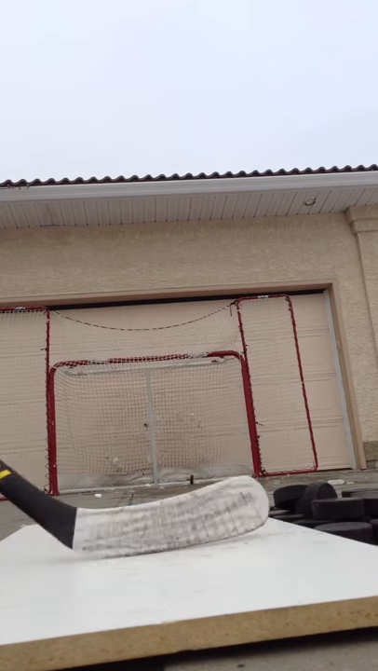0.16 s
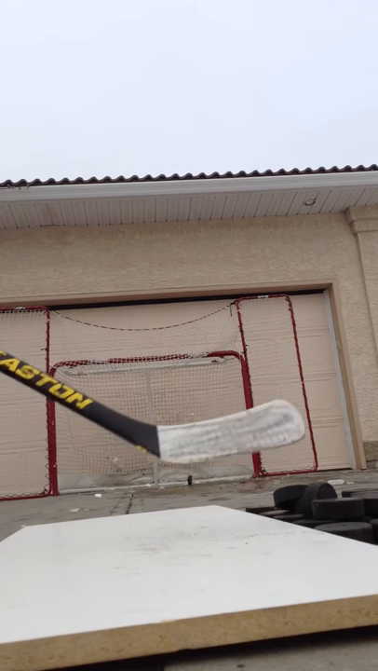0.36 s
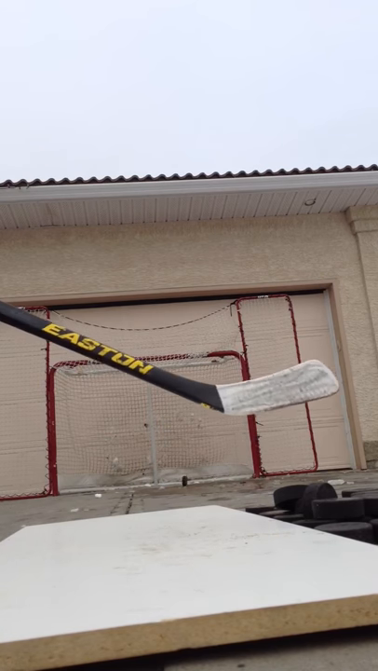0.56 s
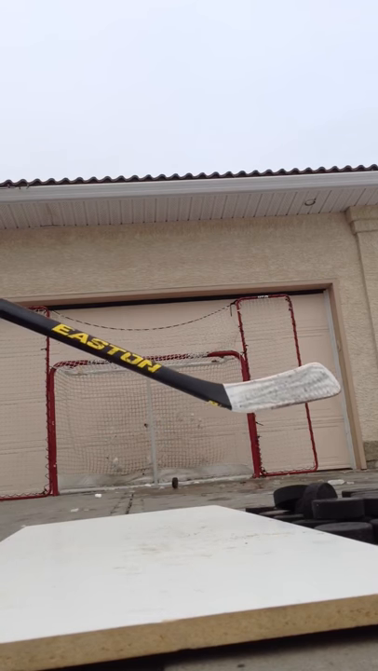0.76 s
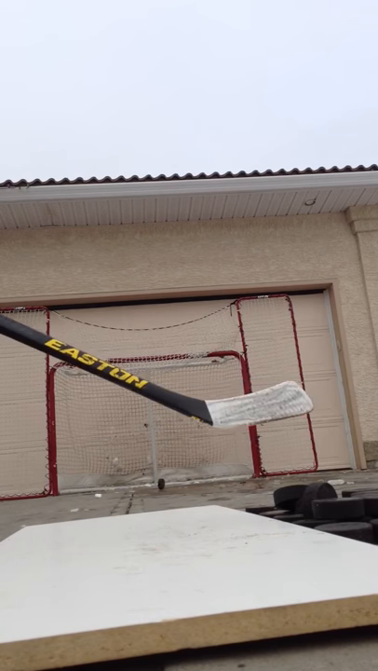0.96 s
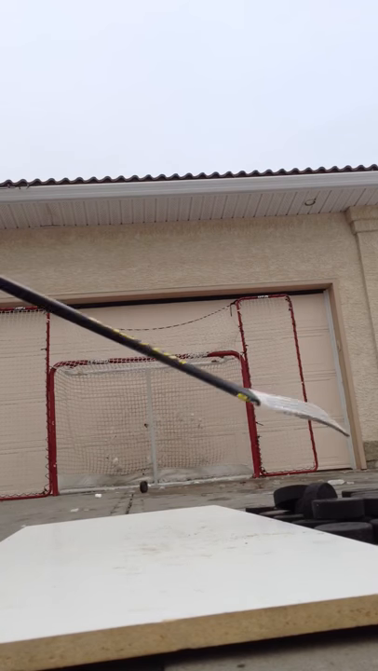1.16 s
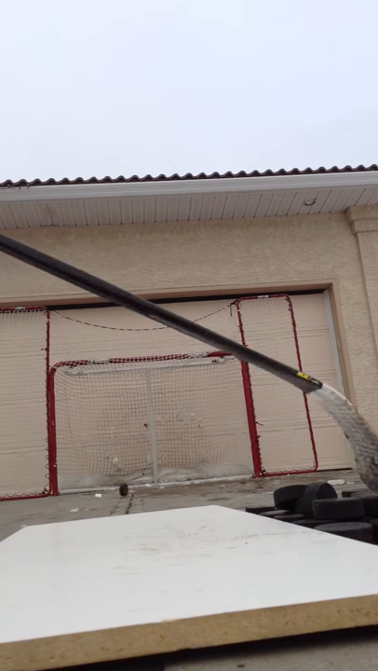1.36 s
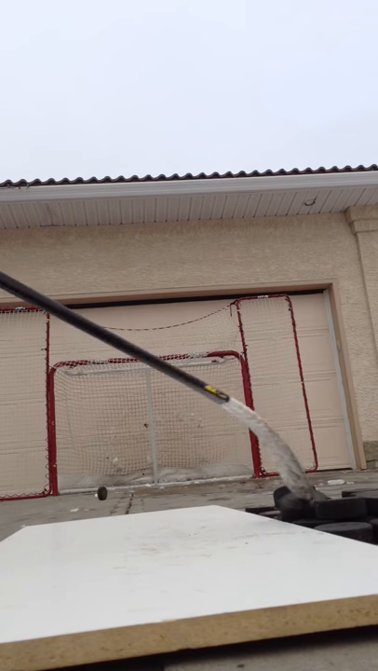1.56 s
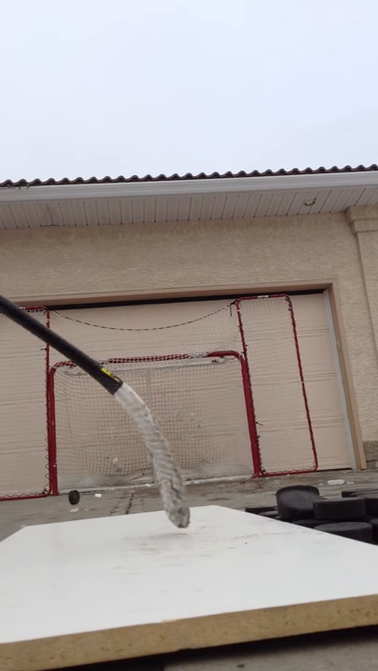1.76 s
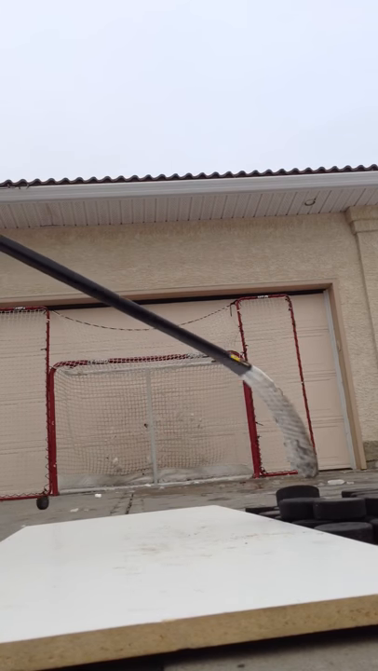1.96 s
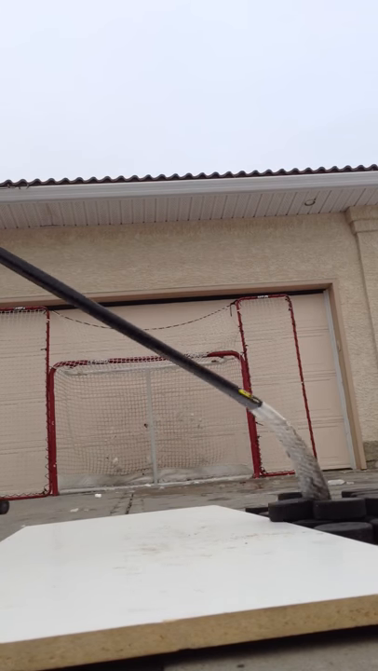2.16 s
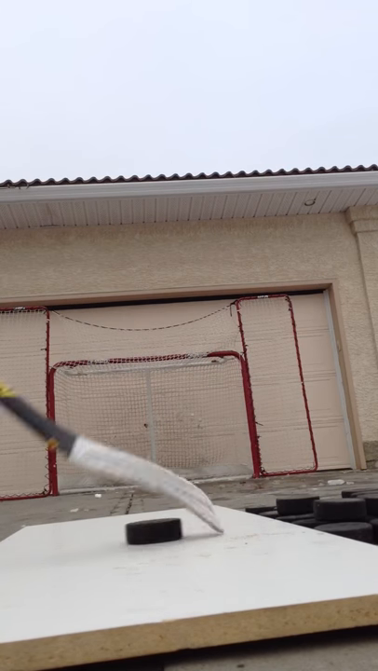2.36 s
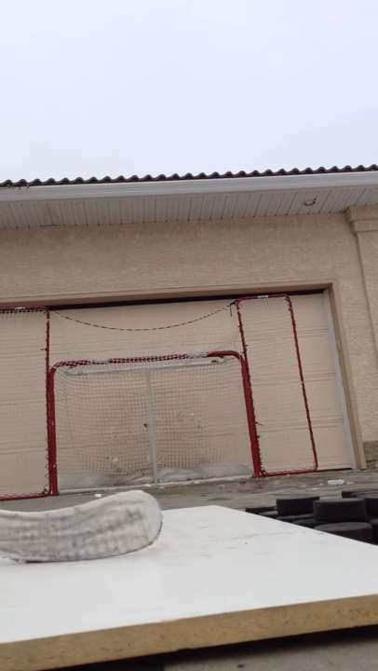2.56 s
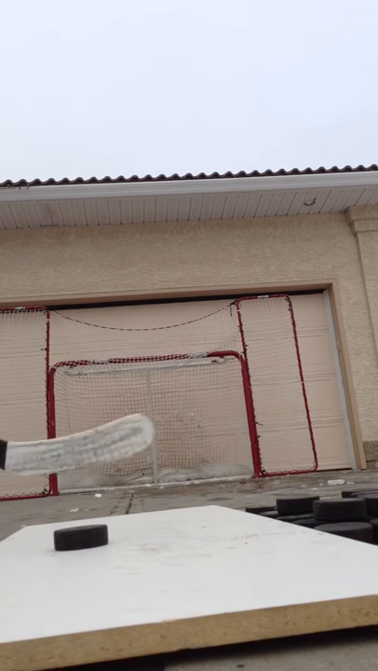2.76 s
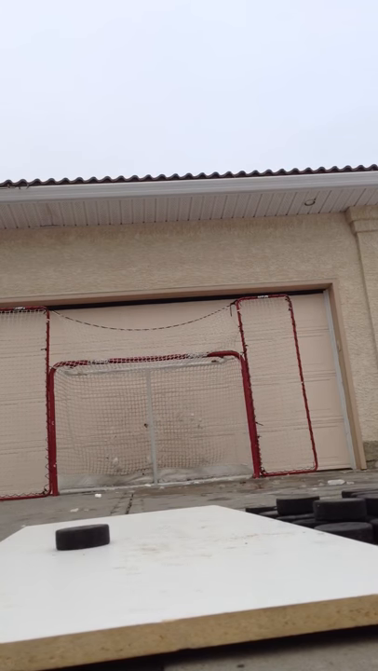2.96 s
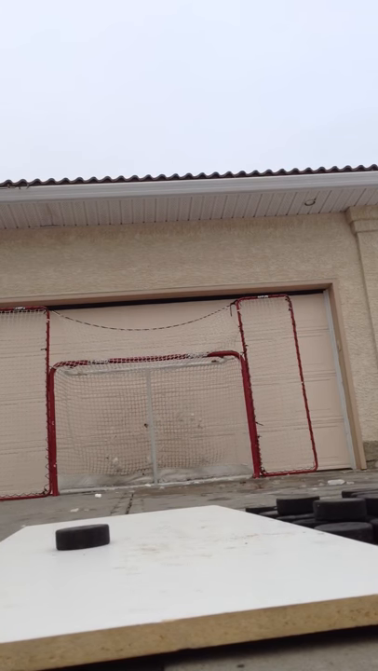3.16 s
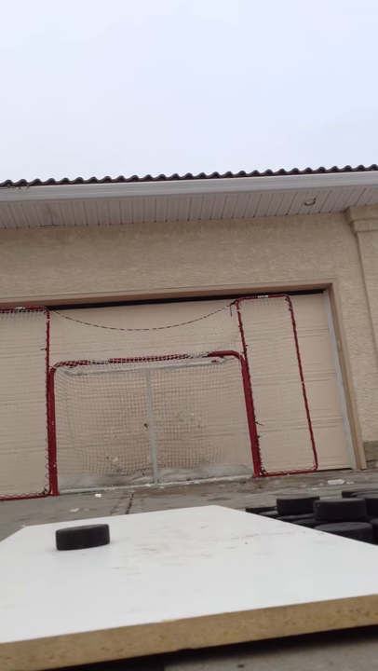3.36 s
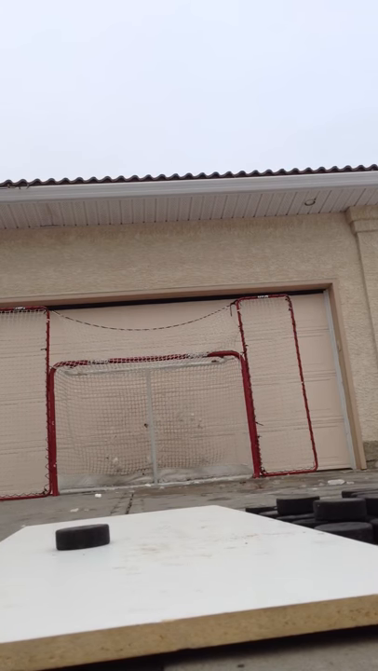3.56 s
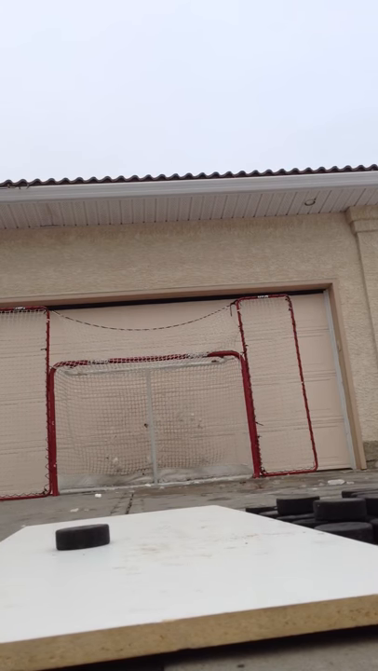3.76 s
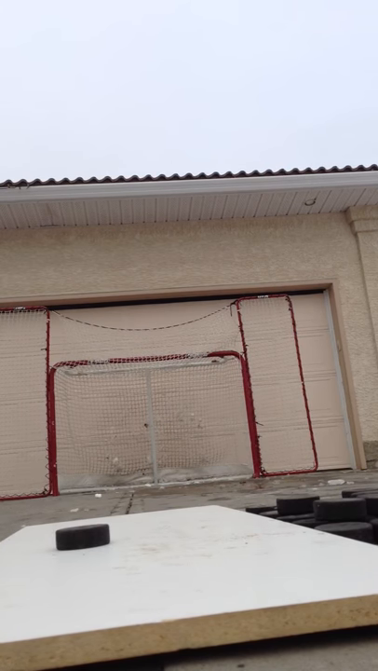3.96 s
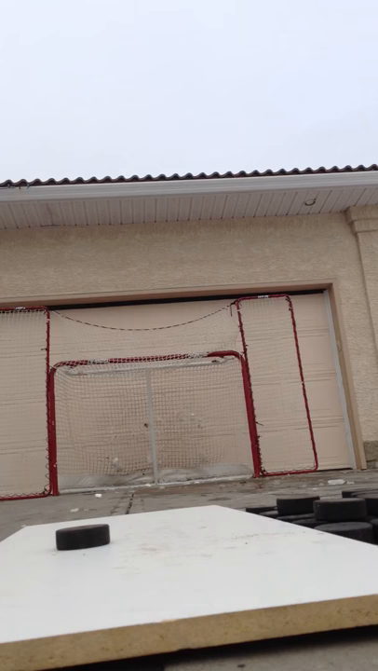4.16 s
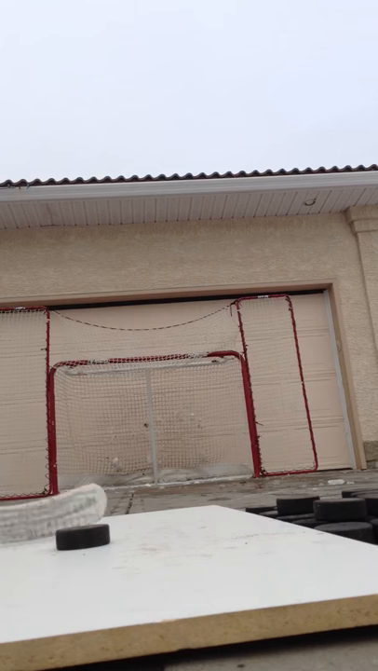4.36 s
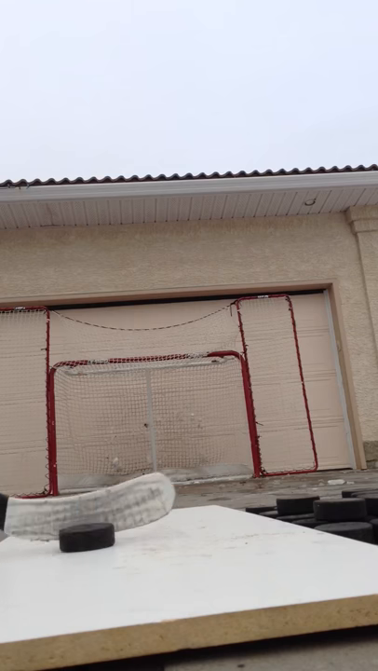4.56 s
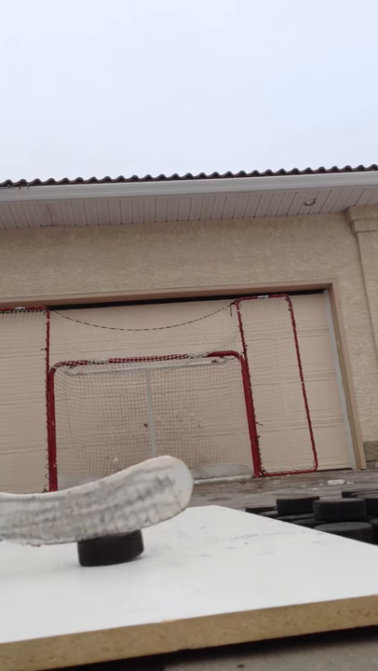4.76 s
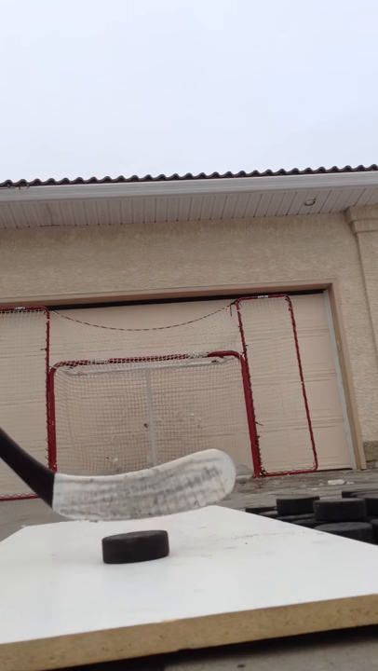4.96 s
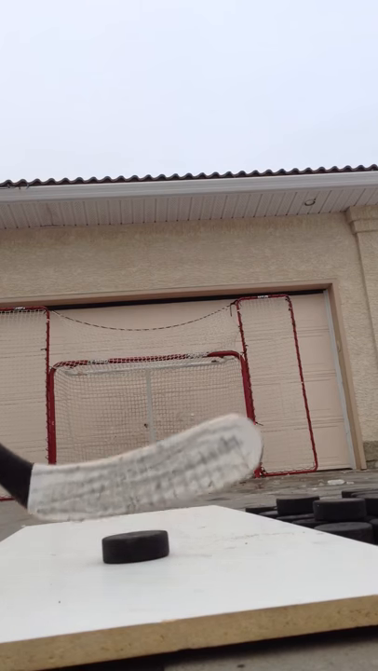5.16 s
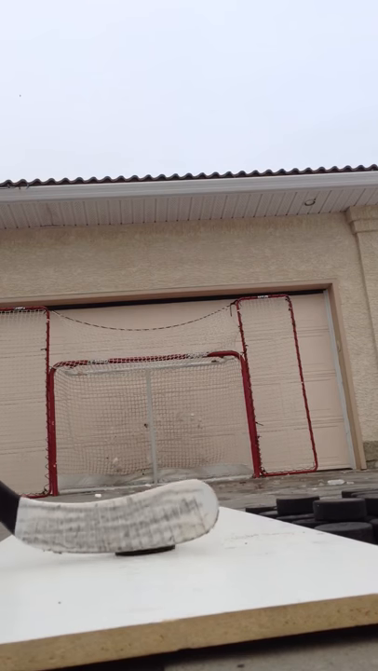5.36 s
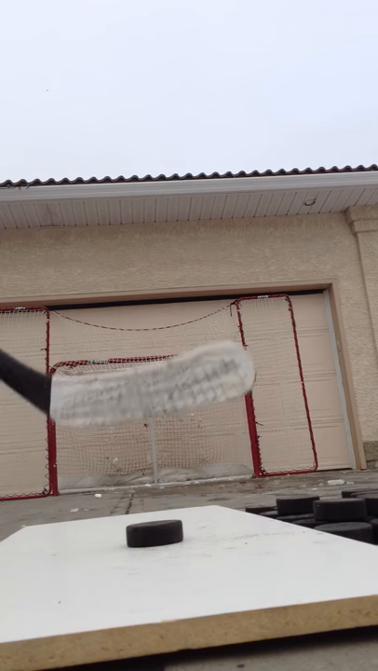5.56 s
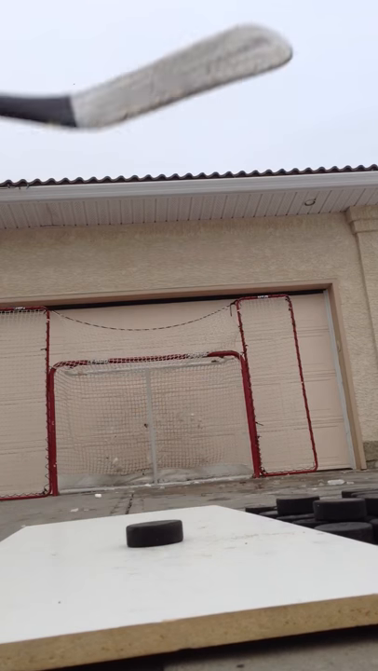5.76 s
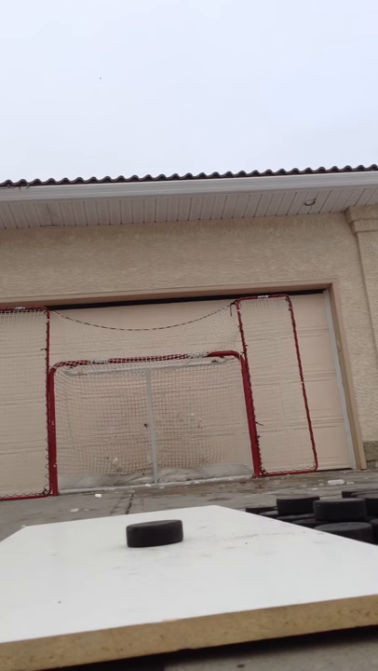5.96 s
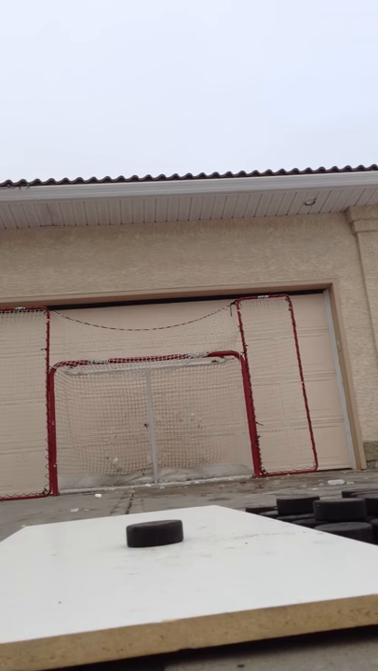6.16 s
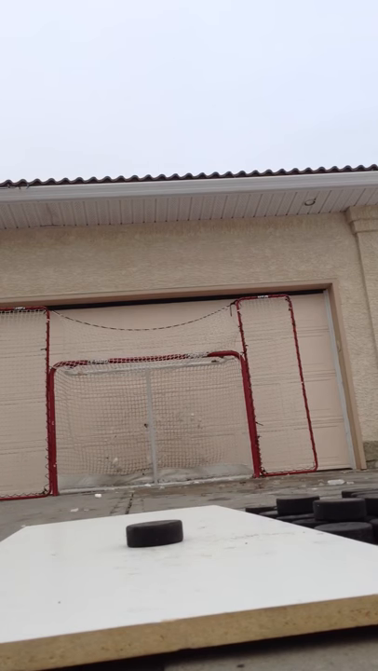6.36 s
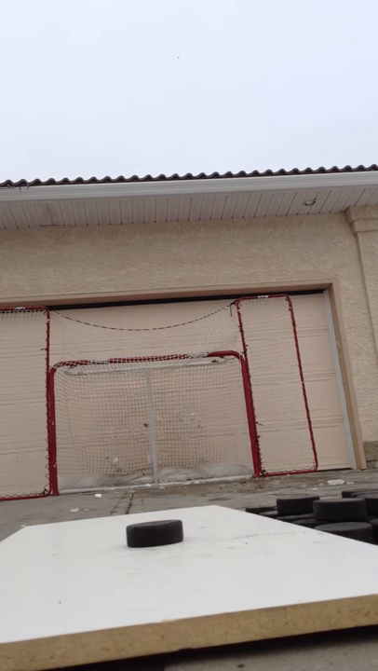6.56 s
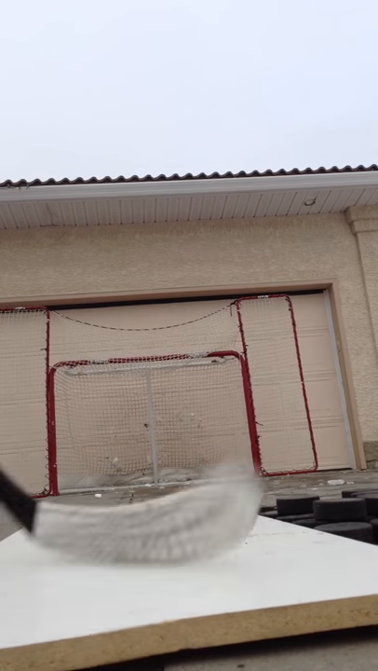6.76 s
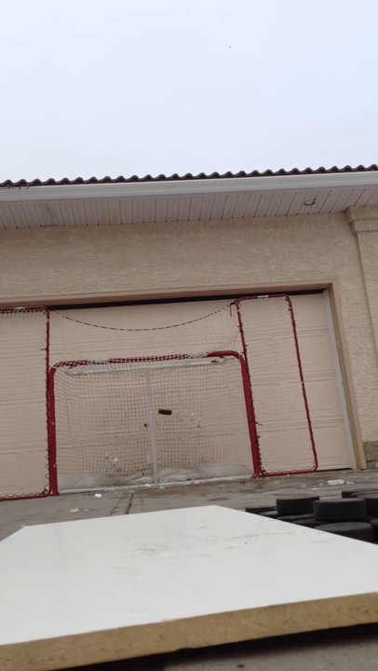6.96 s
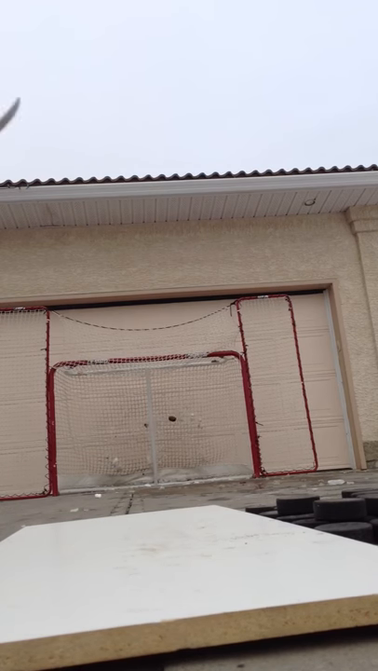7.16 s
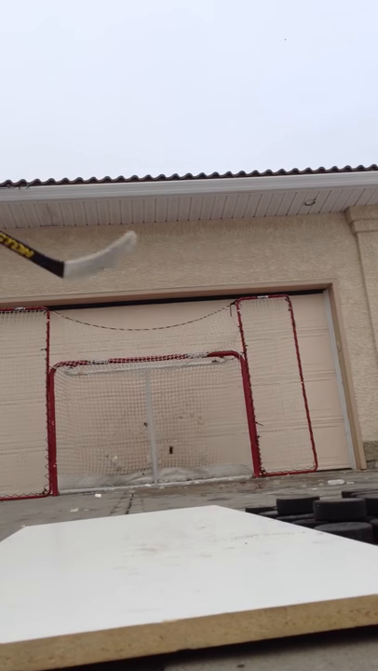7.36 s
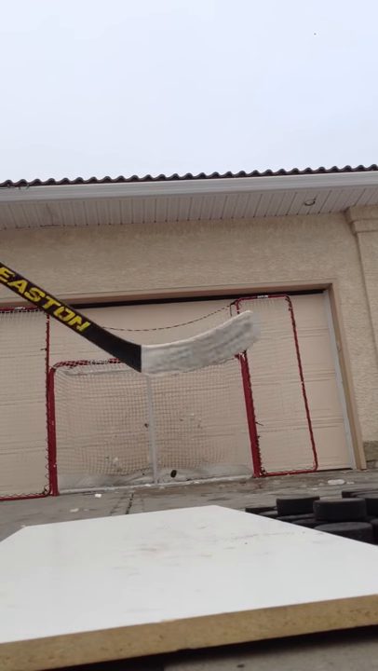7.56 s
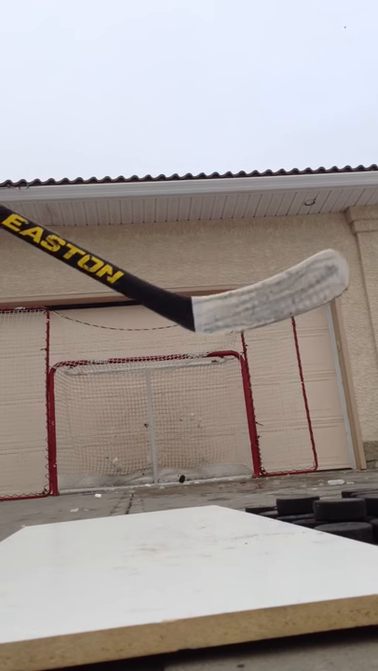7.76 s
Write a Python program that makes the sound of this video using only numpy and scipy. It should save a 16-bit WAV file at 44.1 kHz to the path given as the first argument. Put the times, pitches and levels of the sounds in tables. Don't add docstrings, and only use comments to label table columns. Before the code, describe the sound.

Dry, hollow knocks of a hockey stick and rubber puck on a loose shooting board, heard very near by a small ground microphone. An opening slap clatters away; taps, slides and gritty footsteps fill the gaps over soft distant traffic. Firm double slaps make the board flex low. Wind puffs up just before a huge crack of a shot, followed by rattling rebounds, sharp stone ticks and sandy scuffing, with short sparse wall echoes.

```python
import sys
import numpy as np
from scipy import signal
from scipy.fft import rfft, irfft, next_fast_len
from scipy.io import wavfile
from scipy.ndimage import uniform_filter1d

SR = 44100
rng = np.random.default_rng(int(sys.argv[2]) if len(sys.argv) > 2 else 0)


def transcribe(signal):
    frames = np.atleast_2d(signal).T
    limited = np.clip(frames, -1, 1)
    pcm = np.round(limited * 32767).astype(np.int16)
    wavfile.write(sys.argv[1], SR, pcm)


def voltage_ratio(level):
    return 10 ** (np.asarray(level, float) / 20)


N = 344596
CONTROL_STEP = 32

# (frequency [Hz], density [dB])
STREET_SPECTRUM = [(18, -39), (30, -21), (81, -23), (145, 1), (303, -0.5), (526, -11), (1630, -20.5),
                   (2540, -33.5), (12300, -31), (14800, -48), (16000, -58)]
# (frequency [Hz], density [dB])
WIND_SPECTRUM = [(18, -77), (30, -55), (83, -15.5), (188, -0.5), (230, -8), (268, -4), (355, -24.5),
                 (500, -43), (650, -62), (1100, -120)]
# (peak time [s], rise [s], fall [s], level [dB])
WIND_PUFFS = [
    (0.38, 0.18, 0.33, -45),
    (2.37, 0.28, 0.31, -50.5),
    (4.0, 1.1, 0.85, -52.5),
    (6.25, 0.39, 0.16, -48),
    (6.52, 0.19, 0.19, -42.5),
    (6.585, 0.12, 0.14, -36.5),
    (6.665, 0.14, 0.1, -42),
    (6.761, 0.04, 0.13, -34),
]
# (time [s], pitch [Hz], level [dB])
BIRD_NOTE = [
    (4.15, 5670, -68),
    (4.175, 5720, -62),
    (4.197, 5670, -65),
    (4.218, 5810, -61),
    (4.25, 5660, -66),
    (4.285, 5770, -61),
    (4.325, 5700, -59),
    (4.39, 5580, -72),
]
# (frequency [Hz], T60 [s])
WALL_T60 = [(200, 0.29), (1000, 0.096), (4000, 0.043), (12000, 0.059)]
# (frequency [Hz], density [dB])
SAND_SPECTRUM = [(350, -53), (600, -7.5), (2610, -3), (3530, -8), (3990, -5), (5630, -10.5), (6120, -7.5),
                 (12200, -12), (15400, -20), (16000, -36.5)]
# (peak time [s], rise [s], fall [s], hiss [dB],
# brightness [dB/octave])
SAND_BRUSHES = [(0.2, 1.5, 0.61, -44.5, 3), (1.07, 0.17, 0.25, -61.5, -3.5), (1.265, 0.1, 0.22, -47, 4),
                (1.588, 0.17, 0.022, -45.5, 7), (1.751, 0.079, 0.15, -37, -0.5),
                (1.66, 0.091, .1, -40.5, 2), (1.42, 0.14, 0.15, -56, -1.5), (2.3, 0.13, 1, -40.5, -0.2),
                (3.1, 0.13, 0.15, -33, 2.7), (3.27, 0.33, 0.36, -43, 4.5), (3.441, 0.9, 0.18, -59, 10),
                (3.778, 0.15, 0.88, -43, 2.8), (4.052, 0.021, 0.084, -32.5, 2),
                (4.43, 0.21, 0.26, -55, 0.5), (5.62, 0.081, 0.19, -49, 8), (5.871, 0.31, 0.23, -57.5, -2.5),
                (6.162, 0.07, 0.016, -40, 4), (6.28, 0.2, 1, -46.5, 1.4), (6.7, 1, 0.9, -47.5, 1),
                (6.871, 0.1, 0.052, -25.5, 4), (7.3, 0.0032, 0.13, -28.5, 1.5),
                (7.377, 0.03, 0.083, -17, 4), (7.5, 0.93, 0.4, -39, 0.6), (7.72, 0.09, 0.45, -40.5, 3)]
# (peak time [s], rise [s], fall [s], hiss [dB], board chatter [dB])
BOARD_SLIDES = [(0.24, 0.003, 0.022, -19, -50.5), (0.302, 0.082, 0.26, -38, -31),
                (0.5, 0.52, 0.45, -57.5, -75), (1.75, .04, 0.32, -58, -30.5), (2.0, 0.25, 0.34, -60.5, -66),
                (2.55, 0.48, 0.58, -41.5, -45), (3.444, 0.002, 0.073, -37.5, -54),
                (3.6, 0.14, 0.16, -64, -58), (4.49, 0.002, 0.15, -45, -50), (4.679, 0.11, 0.52, -42.5, -46),
                (4.901, 0.2, 0.21, -50, -46), (5.49, 0.21, 0.32, -45.5, -32), (5.6, 0.11, 0.09, -43, -37),
                (6.879, 0.021, 0.22, -22, -25), (7.044, 0.35, 0.27, -35, -21.5),
                (7.62, 0.083, 0.091, -61, -35), (7.75, 0.2, 0.037, -60, -32.5),
                (3.0, 0.12, 0.072, -53.5, -46), (6.62, .08, 0.097, -48.5, -45)]
# (time [s], peak [dB], centre [Hz], length [ms])
GRIT_CRACKS = [(0.2835, -10, 3500, 7.7), (0.387, -22, 3800, 6.1), (0.4623, -34, 5430, 2.7),
               (0.4923, -22.5, 7160, 3.1), (0.5564, -29.5, 4970, 3.4), (0.595, -32, 3560, 11.5),
               (0.6615, -37, 3870, 8.8), (1.066, -37, 4470, 3.9), (1.7535, -26, 3980, 3.5),
               (2.223, -19, 7800, 3), (2.267, -12, 8050, 0.7), (2.5294, -25, 3240, 22),
               (3.051, -24, 6310, 2.1), (3.1842, -23, 9350, 7.2), (3.3556, -22, 4100, 0.97),
               (3.3906, -13.5, 2750, 1.06), (6.108, -26, 8400, 9.6), (3.706, -35, 4800, 1.8),
               (3.7485, -21.5, 4020, 1.4), (3.4145, -29, 2520, 1.1), (4.0467, -18.5, 5290, 6.9),
               (4.0826, -15.5, 4640, 0.9), (4.7247, -22, 7600, 0.89), (6.764, -30.5, 5250, 2.7),
               (6.9687, -4, 6560, 1.5), (7.0145, -16.5, 5080, 5.7), (7.2986, -16.5, 6700, 3.5),
               (7.382, -4.5, 5500, 3.7), (6.89, -1, 5000, 3), (6.908, -6, 4000, 1.8),
               (6.932, -2, 5470, 3.3), (6.9795, -12, 4600, 1.3), (6.997, -12.5, 5600, 1.5),
               (6.946, -14, 4500, 2), (0.334, -30, 3600, 2), (0.351, -41, 4500, 3.6),
               (0.604, -33, 3800, 4.6), (3.0565, -25.5, 3030, 1.2), (3.086, -21, 2600, 1.5),
               (3.128, -25, 4200, 1.4), (3.146, -40, 2500, 2), (3.16, -29, 5000, 2), (3.383, -30, 5500, 2),
               (3.404, -28, 8000, 2), (3.4735, -24, 6500, 2.4), (3.5866, -41, 5160, 1.6),
               (3.641, -46, 5050, 1.6), (3.6784, -45, 5180, 2), (4.53, -33, 4000, 3), (4.768, -26, 7500, 2),
               (5.06, -59, 6000, 1.2), (5.112, -57, 3500, 1.6), (2.697, -32.5, 4500, 3),
               (3.314, -31, 3320, 5.9), (7.6882, -25, 7100, 12)]
# (frequency [Hz], level [dB])
BOARD_MODES = [(230, -25.5), (281, -2.5), (345, -21), (421, 0), (468, 4.5), (560, 1), (605, -5), (691, 5.5),
               (760, -2), (828, 6), (900, -0.5), (969, 9.5), (1050, 1.5), (1123, 11), (1200, 0), (1270, 12),
               (1340, 7), (1450, 7), (1575, 6.5), (1660, 6.5), (1790, 2), (1917, 5), (2135, 6.5),
               (2397, 4.5), (2640, 2), (2800, 1), (3050, -0.5), (3350, 3.5), (3700, -12), (4200, -9.5)]
# (frequency [Hz], factor on T60 [1])
BOARD_DAMPING = [(250, 1.7), (460, 1.096), (700, 0.52), (1300, 0.28), (2500, 0.23), (4000, 0.11)]
# (peak time [s], rise [s], fall [s], level [dB], centre [Hz])
PUCK_DRAGS = [(0.48, .05, .08, -42, 1800), (1.672, .006, .012, -38, 1900), (2.39, .06, .06, -40, 2400),
              (2.47, .08, .06, -41, 2400), (2.48, .08, .04, -39, 1250), (2.545, .04, .04, -42, 3900),
              (2.56, .06, .08, -37, 2400), (2.678, .01, .03, -35, 2220), (2.76, .04, .1, -44, 1250),
              (2.78, .05, .08, -44, 1750), (2.85, .06, .08, -48, 750), (3.07, .02, .05, -41, 2000),
              (3.32, .01, .02, -38, 3000), (4.54, .02, .08, -36, 1200), (4.81, .04, .02, -40, 2300),
              (4.875, .03, .02, -37, 1400), (4.895, .005, .04, -35, 2200), (6.845, .015, .02, -31, 2500),
              (6.9, .02, .06, -21, 2400), (6.988, .01, .025, -23, 1550), (7.014, .01, .025, -23, 1390),
              (7.09, .04, .06, -33, 2000), (7.17, .05, .06, -36, 2200), (7.338, .01, .015, -35, 1800)]
# (time [s], peak [dB], T60 [s])
BOARD_FLEXES = [(0.241, -14.5, 0.19), (0.304, -18.5, 0.31), (0.37, -21, 0.21), (0.441, -19, 0.14),
                (0.545, -28.5, 0.1), (1.715, -17, 0.22), (4.83, -16.5, 0.15), (5.36, -29, 0.25),
                (6.89, -15.5, 0.36), (6.96, -20, 0.47), (7.124, -25.5, 0.21), (7.222, -20, 0.15)]
# (time [s], peak [dB], T60 [s])
BOARD_REBOUNDS = [(0.28, -18.5, 0.064), (0.304, -14.5, 0.073), (0.351, -16, 0.12), (0.369, -11, 0.057),
                  (0.399, -13.5, 0.084), (0.43, -13, 0.074), (0.319, -21, 0.04), (0.328, -20, .05),
                  (0.378, -20, 0.065), (0.448, -21.5, 0.091), (0.548, -32.5, 0.048), (4.799, -30, 0.043),
                  (4.877, -25, 0.042), (5.433, -29, 0.078), (5.592, -35, 0.067), (7.14, -24.5, .06),
                  (7.077, -16, 0.076), (7.04, -20, 0.077), (2.739, -37, .06), (0.483, -27.5, 0.24),
                  (0.53, -24.5, 0.071), (4.528, -20.5, 0.21), (4.93, -24, 0.27), (4.986, -26.5, 0.054),
                  (5.03, -26, 0.088), (5.048, -28, 0.15), (5.086, -31.5, 0.064), (5.095, -33.5, 0.086),
                  (5.138, -40.5, 0.07), (5.494, -26.5, 0.18), (7.06, -9, 0.068), (7.084, -13, 0.15),
                  (7.124, -7, 0.075), (7.157, -16, 0.093), (7.196, -18.5, 0.074), (7.222, -13.5, 0.05),
                  (7.246, -19.5, 0.055), (7.317, -22.5, 0.025), (7.269, -22.5, 0.078), (7.285, -23, 0.11),
                  (7.336, -25.5, 0.19)]
# (time [s], peak [dB], centre [Hz], T60 [s], edge click re peak [dB])
PUCK_TAPS = [(3.335, -31.5, 900, 0.026, 11), (1.361, -18.5, 1137, 0.061, 3.5), (1.587, -30, 566, 0.15, 3),
             (1.629, -27, 579, 0.041, -12), (1.658, -28, 1200, 0.03, -5), (2.129, -21.5, 690, 0.032, -12),
             (2.166, -13, 1120, 0.043, -18), (2.227, -17, 442, 0.17, -8.5), (3.066, -20, 1700, 0.044, -2),
             (3.113, -26, 1600, 0.04, 1), (3.319, -28.5, 2240, 0.063, 11), (3.366, -25.5, 2440, 0.036, 8.5),
             (3.444, -13.5, 1090, 0.035, 3.5), (3.479, -29.5, 663, 0.074, 6.5),
             (3.721, -26.5, 566, 0.047, 2), (4.027, -37, 311, 0.17, 17.5), (4.424, -37, 1140, 0.081, 9),
             (4.661, -25, 730, 0.1, -19), (5.77, -41.5, 1540, 0.075, 2), (6.108, -27, 468, 0.046, -36),
             (6.154, -29.5, 306, 0.022, 11.5), (7.554, -31, 1930, 0.094, -11),
             (7.763, -32, 740, 0.084, -13)]
# (time [s], peak [dB], centre [Hz], T60 near 500 Hz [s], snap re peak [dB])
STICK_SLAPS = [(0.239, -4, 1305, 0.34, 10.5), (1.708, -4.5, 1770, 0.12, 2.5),
               (1.729, -11.5, 644, 0.19, -26), (2.27, -9, 1100, 0.2, -5.5), (2.311, -7.5, 1240, 0.21, 1.5),
               (2.342, -14, 1180, 0.17, -11), (2.507, -16, 460, 0.19, -1), (2.634, -17, 570, 0.1, 9.5),
               (2.77, -21.5, 700, 0.085, -8), (4.488, -1.5, 1022, 0.14, -12.5), (4.626, -12, 680, 0.055, 4),
               (4.753, -8, 850, 0.12, -2.5), (4.825, -2.5, 484, 0.096, -3.5), (4.886, -10.5, 506, 0.2, 8),
               (5.351, -13, 970, 0.12, 6), (5.356, -3.5, 850, 0.13, -5), (5.389, -14, 700, 0.086, 1),
               (6.842, -28, 331, 0.2, -7), (6.874, 10, 1450, 0.29, -6), (6.889, 4, 1300, 0.15, 3.5),
               (6.909, -10, 1250, 0.13, -15), (6.931, -7.5, 674, 0.09, 3), (6.958, -9.5, 485, 0.04, -10),
               (6.992, -18, 455, 0.1, -10), (6.92, -9.5, 796, 0.1, -6), (6.945, -4.5, 493, 0.05, -11),
               (4.5, -20, 420, 0.31, -30), (6.9, -5.5, 1100, .15, -15)]


def evened(x):
    return x / np.sqrt(np.mean(x ** 2) + 1e-20)


def read(points, hz):
    f, value = np.transpose(points)
    return np.interp(np.log(hz + 1), np.log(f + 1), value)


def add(mix, time_s, sound):
    part = mix[round(time_s * SR):][:len(sound)]
    part += sound[:len(part)]


def coloured(x, points):
    size = next_fast_len(len(x))
    gain = voltage_ratio(read(points, np.fft.rfftfreq(size, 1 / SR)))
    return irfft(rfft(x, size) * gain, size)[:len(x)]


def stroke(peak_s, rise_s, fall_s, db):
    t = np.arange(0, N + CONTROL_STEP, CONTROL_STEP) / SR - peak_s
    distance = np.maximum(-t / max(rise_s, .002), t / max(fall_s, .002))
    left = np.maximum(1 - distance, 0)
    return (voltage_ratio(db) * left ** 1.97) ** 2


def stretched(control):
    return np.interp(np.arange(N) / CONTROL_STEP, np.arange(len(control)), control)


def street():
    return voltage_ratio(-58.5) * evened(coloured(rng.standard_normal(N), STREET_SPECTRUM))


def wind(lumps):
    breeze_db = -65
    power = voltage_ratio(breeze_db) ** 2 + sum(stroke(*row) for row in WIND_PUFFS)
    return stretched(np.sqrt(power)) * evened(lumps * coloured(rng.standard_normal(N), WIND_SPECTRUM))


def bird(lumps):
    t = np.arange(N) / SR
    time_s, hz, db = np.transpose(BIRD_NOTE)
    waver = 1 + .004 * evened(uniform_filter1d(rng.standard_normal(N), 900))
    phase = 2 * np.pi * np.cumsum(np.interp(t, time_s, hz) * waver) / SR
    return lumps * voltage_ratio(np.interp(t, time_s, db, -120, -120)) * np.sin(phase)


def outdoors():
    hum = street()
    lumps = voltage_ratio(2.5 * evened(uniform_filter1d(rng.standard_normal(N), 2500)))
    return hum + wind(lumps) + bird(lumps)


def yard(x):
    echoes = np.zeros(SR // 2)
    at = np.arange(300, len(echoes) - 20, 20)
    echoes[at + rng.integers(0, 20, len(at))] = rng.choice([-1., 1.], len(at))
    hz, t, z = signal.stft(echoes, SR, nperseg=256)
    fade = voltage_ratio(-60 * t / read(WALL_T60, hz)[:, None])
    tail = signal.istft(z * fade, SR, nperseg=256)[1]
    return signal.fftconvolve(x, tail / np.linalg.norm(tail))[:N]


def rubbing(control):
    brush_chatter_db, slide_tilt_db, still_db = -7, -5, -78
    # (peak s, rise s, fall s, hiss dB, chatter dB, tilt dB/octave)
    rows = [(*row[:4], row[3] + brush_chatter_db, row[4]) for row in SAND_BRUSHES]
    rows += [(*row, slide_tilt_db) for row in BOARD_SLIDES]
    level = 4 if control == "chatter" else 3
    power = np.array([stroke(*row[:3], row[level]) for row in rows])
    total = power.sum(0) + voltage_ratio(still_db) ** 2
    if control == "tilt":
        return stretched(np.array(rows)[:, 5] @ power / total)
    return stretched(10 * np.log10(total))


def scuffs():
    flicker = voltage_ratio(1.8 * evened(uniform_filter1d(rng.standard_normal(N), 500)))
    crackle = (rng.random(N) < 350 / SR) * voltage_ratio(4.5 * np.minimum(rng.exponential(1, N), 3.5))
    crackle = crackle * rng.choice([-1, 1], N)
    grain = rng.standard_normal(40) * signal.windows.hann(40)
    crackle = signal.oaconvolve(crackle, grain)[:N]
    hiss = rng.standard_normal(N) + .6 * evened(crackle)
    sand = evened(coloured(flicker * hiss, SAND_SPECTRUM))
    hz, t, z = signal.stft(sand, SR, nperseg=256)
    tilt = np.clip(np.interp(t, np.arange(N) / SR, rubbing("tilt")), -9, 9)
    octaves = np.log2((hz[:, None] + 300) / 6000)
    patches = uniform_filter1d(rng.standard_normal(z.shape), 7, 0)
    patches = evened(uniform_filter1d(patches, 25, 1))
    z = z * voltage_ratio(octaves * tilt + 1.7 * patches)
    return voltage_ratio(rubbing("hiss")) * signal.istft(z, SR, nperseg=256)[1][:N]


def burst(t, noise, hz, octaves, length_s):
    f = np.fft.rfftfreq(len(t), 1 / SR) + 1
    puff = irfft(rfft(noise) * np.exp(-.5 * (np.log2(f / hz) / octaves) ** 2), len(t))
    puff *= np.exp(-t / length_s) * (1 - np.exp(-t / (0.19 * length_s)))
    return puff / abs(puff).max()


def clicks_of_edges():
    delay_s = 0.0017
    rows = list(GRIT_CRACKS)
    rows += [(s + delay_s, db + snap_db - 10, 2730, 4.4) for s, db, _, _, snap_db in STICK_SLAPS]
    rows += [(s + delay_s, db + click_db, 3400, 2.2) for s, db, _, _, click_db in PUCK_TAPS]
    rows += [(s + delay_s, db - 17, 1400, 2.3) for s, db, _ in BOARD_REBOUNDS]
    return rows


def ticks():
    out, t, rows = np.zeros(N), np.arange(1024) / SR, clicks_of_edges()
    noises = rng.standard_normal((len(rows), 1024))
    for (s, db, hz, length_ms), noise in zip(rows, noises):
        length_s = np.clip(length_ms, .3, 20) / 2000
        add(out, s, voltage_ratio(db) * burst(t, noise, hz, octaves=.65, length_s=length_s))
    return out


def ring(t, centre_hz, t60_s, luck, octaves):
    hz, db = np.transpose(BOARD_MODES)[:, :, None]
    level_luck, pitch_luck, weak_luck = luck[:, :, None]
    weak_hz = 120 + 1.15 * hz * np.exp(.1 * weak_luck)
    hz = np.concatenate([hz * (1 + .004 * pitch_luck), weak_hz])
    db = np.concatenate([db + 2 * level_luck, 0 * db - 5])
    short = np.repeat([1, .4], len(BOARD_MODES))[:, None]
    colour = np.exp(-.5 * (np.log2(hz / centre_hz) / octaves) ** 2)
    late = np.maximum(t - .0008 - .025 / np.sqrt(hz), 0)
    decay = np.exp(-np.log(1000) * late / (short * t60_s * read(BOARD_DAMPING, hz)))
    onset = 1 - np.exp(-1.2 * hz * late)
    sound = (voltage_ratio(db) * colour * decay * onset * np.sin(2 * np.pi * hz * late)).sum(0)
    return sound / abs(sound).max()


def chatter():
    t, out = np.arange(2000) / SR, np.zeros(N)
    shaking = voltage_ratio(rubbing("chatter"))
    for luck in rng.standard_normal((6, 3, len(BOARD_MODES))):
        taps = (rng.random(N) < 80 / SR) * voltage_ratio(np.minimum(rng.exponential(1, N), 4))
        out += signal.oaconvolve(taps * shaking, ring(t, 750, .045, luck, octaves=.9))[:N]
    return voltage_ratio(-5) * out


def drags():
    out, t, count = np.zeros(N), np.arange(0, .03, 1 / SR), len(PUCK_DRAGS)
    slips = rng.standard_normal((count, 9000))
    grain_db = 2.5 * np.minimum(rng.exponential(1, (count, 90)), 3)
    slips = slips * voltage_ratio(grain_db.repeat(100, axis=1))
    lucks = rng.standard_normal((count, 3, len(BOARD_MODES)))
    for (s, rise_s, fall_s, db, hz), noise, luck in zip(PUCK_DRAGS, slips, lucks):
        rise_s, fall_s = np.clip([rise_s, fall_s], .004, .1)
        swell = np.interp(np.arange(len(noise)) / SR, [0, rise_s, rise_s + fall_s], [0, 1, 0])
        modes = ring(t, hz, .05, luck, octaves=.35)
        sung = evened(signal.oaconvolve(noise, modes)[:len(noise)])
        add(out, s - rise_s, voltage_ratio(db) * swell * sung)
    return out


def flexes():
    out, t = np.zeros(N), np.arange(SR // 2) / SR
    swell = 1 - np.exp(-(t / 0.023) ** 2)
    lucks = rng.uniform(-2.0, 1, (len(BOARD_FLEXES), 2))
    for (s, db, t60_s), luck in zip(BOARD_FLEXES, lucks):
        detune = 1 + 0.0071 * luck
        hum = np.sin(2 * np.pi * 280.3 * detune[0] * t)
        hum += voltage_ratio(0.39) * np.sin(2 * np.pi * 420 * detune[1] * t)
        add(out, s, voltage_ratio(db - 60 * t / max(t60_s, .05)) * swell * hum)
    return out


def blows_on_board():
    snap_above_hz = 646
    rows = [(*row, row[2] + snap_above_hz) for row in STICK_SLAPS]
    rows += [(*row[:4], -5, row[2] + snap_above_hz) for row in PUCK_TAPS]
    rows += [(s, db, 400, t60_s, -1, 560) for s, db, t60_s in BOARD_REBOUNDS]
    return rows


def knocks():
    out, rows = np.zeros(N), blows_on_board()
    lucks = rng.standard_normal((len(rows), 3, len(BOARD_MODES)))
    for (s, db, hz, t60_s, snap_db, snap_hz), luck in zip(rows, lucks):
        t60_s = np.clip(t60_s, .015, .3)
        t = np.arange(int(.85 * t60_s * SR)) / SR
        cycles = np.maximum(t[:400] - .0013, 0) * snap_hz
        snap = 3.7 * np.sin(2 * np.pi * cycles) * np.exp(-1.6 * cycles) * (1 - np.exp(-8 * cycles))
        add(out, s, voltage_ratio(db + snap_db) * snap)
        add(out, s, voltage_ratio(db) * ring(t, hz, t60_s, luck, octaves=1.05))
    return signal.sosfilt(signal.butter(5, 245, "high", fs=SR, output="sos"), out)


def scene():
    blows, clicks = knocks() + flexes(), ticks()
    walls = yard(voltage_ratio(-15.0) * blows + voltage_ratio(-10.0) * clicks)
    return (blows + clicks + walls + chatter() + drags() + scuffs() + outdoors())[None]


def roll_off(x):
    return signal.sosfilt(signal.butter(12, 16480, fs=SR, output="sos"), x)


def record(dry):
    ceiling = .66
    x = dry / (1 + (abs(dry) / ceiling) ** 6) ** (1 / 6)
    x = signal.sosfiltfilt(signal.butter(2, 52, "high", fs=SR, output="sos"), x)
    x = signal.oaconvolve(x, signal.firwin(101, 15500, fs=SR)[None], "same")
    return roll_off(x)


dry = scene()
out = record(dry)
transcribe(out)
```